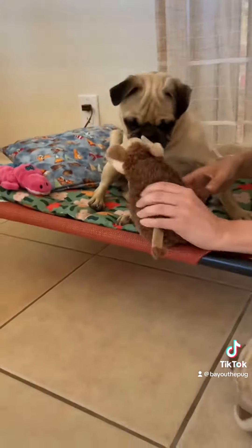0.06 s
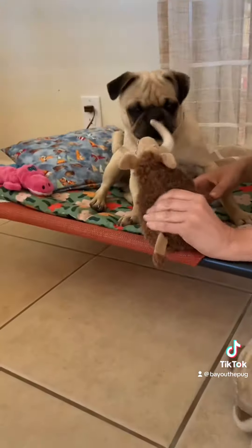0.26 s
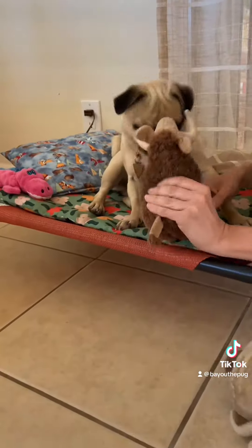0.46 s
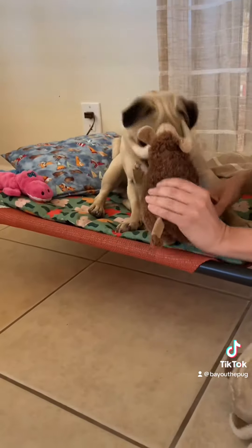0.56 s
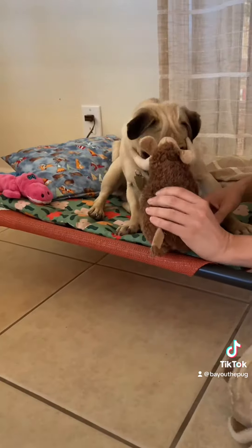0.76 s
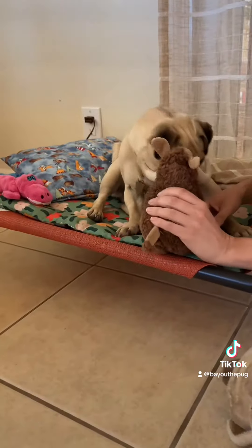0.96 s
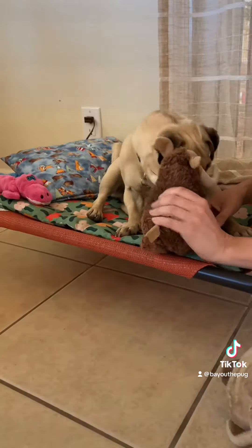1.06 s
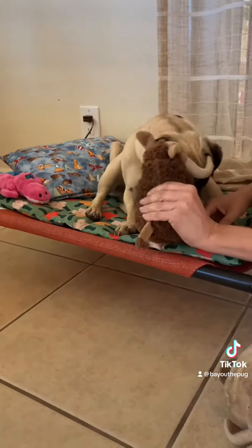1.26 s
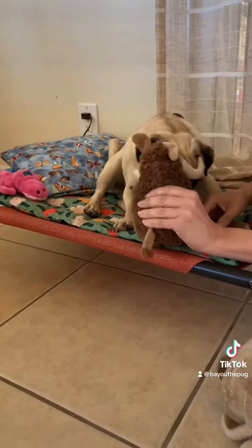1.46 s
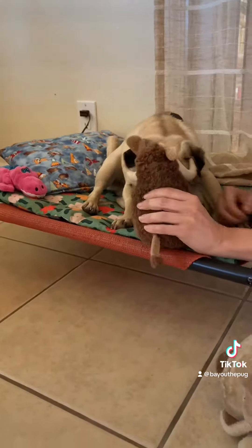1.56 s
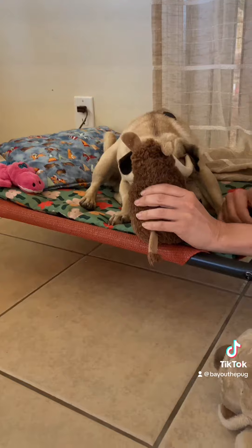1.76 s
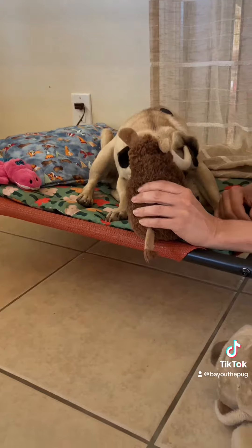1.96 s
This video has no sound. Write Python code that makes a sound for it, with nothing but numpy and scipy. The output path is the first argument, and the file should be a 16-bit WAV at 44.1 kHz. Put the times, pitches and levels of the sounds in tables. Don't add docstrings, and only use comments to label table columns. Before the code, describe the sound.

A squeaker in a plush toy is squeezed three times: a rising then sagging squeak, a very short airy chirp with a soft knock, and a steadier arched squeak. Close phone microphone, small tiled room, faint low hum.

```python
import sys
import numpy as np
from scipy import signal
from scipy.fft import rfft, irfft
from scipy.io import wavfile
from scipy.ndimage import uniform_filter1d

SR = 44100
rng = np.random.default_rng(int(sys.argv[2]) if len(sys.argv) > 2 else 0)


def unload_wav(signal):
    wavfile.write(
        sys.argv[1],
        SR,
        np.round(np.clip(np.atleast_2d(signal).T, -1, 1) * 32767).astype(np.int16),
    )


def field_ratio(decibels):
    return 10 ** (np.asarray(decibels, dtype=float) / 20)


N = 88200
T = np.arange(N) / SR

# [t/s, f/Hz, level/dB]
HUM = [(0.0, 98.42, -74), (0.319, 101.6, -57), (0.581, 97.84, -62.5), (0.67, 107.8, -59.5),
       (0.711, 102.4, -67), (0.751, 100.8, -54), (0.811, 99, -89.5), (0.85, 99.9, -62.5),
       (1.11, 95.57, -56), (1.199, 97.1, -68), (1.29, 96.66, -60.5), (1.37, 88.26, -61), (1.641, 87, -63),
       (1.689, 74.17, -60), (1.729, 79.35, -63), (2.0, 79.5, -68)]
SUB_HUM = [(0.0, 48.64, -82), (0.069, 48.86, -94.5), (0.411, 46.3, -69), (0.59, 46.98, -74.5),
           (0.73, 47.15, -68), (1.08, 48.4, -59), (1.27, 46.92, -80), (1.501, 44.94, -58),
           (1.64, 46.43, -73.5), (1.791, 50.87, -60.5), (1.9, 53.6, -62), (2.0, 50, -56.5)]
# [f/Hz, density/dB per Hz]
STILL_AIR = [(18, -24.5), (30, -12), (115, -2.5), (702, -30.5), (2120, -38.5), (10500, -40), (11700, -65.5),
             (14000, -50.5), (16000, -63.5)]
DRAG_T = [.63, .93, 1.14, 1.25, .05, 1.6, .3, .78]
# [rise/s, hold/s, fall/s, level/dB]
DRAGS = [(0.013, 0.037, 0.12, -55), (0.0087, 0.18, 0.11, -60.5), (0.043, 0.12, 0.039, -64.5),
         (.04, 0.063, 0.15, -69), (.008, 0.045, .06, -82), (0.024, 0.076, 0.054, -58),
         (.03, 0.041, 0.04, -77), (0.024, 0.043, .03, -79.5)]
# [f/Hz, density/dB per Hz]
DRAG_COLOUR = [(71, -39.5), (120, -6), (514, -23), (1180, -34.5), (1550, -53.5), (2140, -38.5), (3000, -48),
               (3900, -83.5), (6600, -120)]
# onsets [t/s], swells [rise/s, hold/s, fall/s], levels [level/dB]
SCUFF_T = [.935, .62, .055]
SCUFFS = [(.015, .08, .1), (.03, .15, .04), (.01, .06, .05)]
SCUFF_LEVEL = [-61.5, -69, -73.5]
# [f/Hz, density/dB per Hz]
SCUFF_COLOUR = [(120, -8), (250, -1.5), (650, -1.5), (800, -13), (1150, -16.5), (1400, -41)]
# onsets [t/s], swells [rise/s, hold/s, fall/s], levels [level/dB]
PUFF_T = [1.43, 1.47, 1.578]
PUFFS = [(.012, .025, .08), (.03, .05, .06), (.003, .01, .12)]
PUFF_LEVEL = [-63, -70.5, -79.5]
# [f/Hz, density/dB per Hz]
PUFF_COLOUR = [(200, 0), (600, 1), (1500, -4.5), (2300, -6), (3200, -12), (5000, -11), (5600, -30)]
# onsets [t/s], swells [rise/s, hold/s, fall/s], levels [level/dB]
HISS_T = [
    .055,
    1.432,
    1.57,
    .93,
    .572,
]
HISSES = [(.022, .158, .012), (.008, .03, .13), (.02, .03, .06), (.03, .04, .08), (.003, .004, .03)]
HISS_LEVEL = [-54.5, -64.5, -74.5, -80.5, -48.5]
# [f/Hz, density/dB per Hz]
HISS_COLOUR = [(300, -16.5), (1000, -10.5), (5000, -3), (5750, -7), (6500, -4.5), (8800, -5), (10900, -2),
               (12900, -4.5), (16000, -14.5)]
# [f/Hz, level/dB, T60/s]
TICK_MODES = [(930, -52, 0.025), (2730, -56.5, .012)]
# onsets [t/s], levels [level/dB]
KNOCK_T = [
    1.579,
    .5715,
    .056,
]
KNOCK_LEVEL = [-36.5, -35, -56]
# [f/Hz, level/dB, T60/s]
FRAME_MODES = [(265, 2.5, 0.086), (530, -1, 0.074), (745, -1, 0.1), (907, 11, 0.024), (1057, 3, 0.063),
               (1610, -13.5, 0.024)]
# [f/Hz, density/dB per Hz]
THUD_COLOUR = [(100, -34.5), (200, -3.5), (500, 4.5), (1200, 3.5), (1500, -12.5), (1900, -20), (2600, -25),
               (4000, -51)]
# [t/s, f/Hz, level/dB]
SQUEEZES = [
    [(.225, 1241, -43.5), (.236, 1157, -32), (.2385, 1215, -18), (.253, 1333, -16.5), (.263, 1466, -15.5),
     (.277, 1478, -21), (.281, 1180, -24.5), (.292, 1076, -25.5), (.296, 1000, -72)],
    [(.558, 881.7, -74), (.5715, 980, -40), (.5745, 1030, -23), (.5795, 1090, -27), (.581, 1070, -43),
     (.584, 950, -70)],
    [(1.075, 1220, -73), (1.091, 1219, -32), (1.094, 1210, -18.5), (1.104, 1234, -20), (1.114, 1281, -18),
     (1.129, 1206, -19), (1.14, 1147, -22), (1.155, 1102, -23.5), (1.163, 969.6, -59.5)],
]
# [air level/dB, shell treble level/dB, wobble factor]
MANNER = [
    (-21, -2.5, 2.2),
    (-9, 5, 16),
    (-22, -1, .7),
]
# [f/Hz, level/dB]
SHELL = [(1050, -3.5), (1400, -8), (2700, -8.5), (4900, -9), (6300, -3), (7600, 4.5), (8900, -1.5),
         (10300, -15.5)]
INHALE = [(950, -9.5), (2100, -9), (3200, -14.5), (4400, -13.5), (6200, -23.5), (7400, -5.5), (8400, -0.5),
          (10000, -5.5), ]
SHELL_TURNED = [(1100, -4.5), (2400, -10), (3700, -11), (5000, -8), (6200, -7), (7500, 1.5), (8700, 2),
                (10300, -13)]
# [f/Hz, T60/s]
ROOM_T60 = [(250, 0.057), (1150, 0.5), (1450, 0.6), (3500, 0.56), (9000, 0.28), (15000, 0.21)]
# [f/Hz, phase/rad]
PORT_PHASE = [(250, -1), (600, -2), (1200, -0.32), (2600, 1), (5750, 3.1), (8800, 7), (11800, 8.5),
              (16000, 13.8)]

SHELL_TOP_HZ, TOP_SAG_DB = 15300, -11
SIDE_GAP_HZ = 8600


def curve(hz, table):
    table = np.array(table, float)
    return np.interp(np.log(np.maximum(hz, 1)), np.log(table[:, 0]), table[:, 1])


def shape(x, gain):
    f = np.arange(N + 1) * SR / (2 * N)
    return irfft(rfft(x, 2 * N) * gain(f), 2 * N)[..., :N]


def noise(table, like):
    mid, side = rng.standard_normal((2, N))
    mid = shape(mid, lambda f: field_ratio(curve(f, table)) * np.sqrt(1 + like(f)))
    side = shape(side, lambda f: field_ratio(curve(f, table)) * np.sqrt(1 - like(f)))
    return np.array([mid + side, mid - side]) / np.sqrt(np.mean(mid ** 2 + side ** 2))


def incoherent(f):
    return 0 * f


def bass_coherent(f):
    return np.clip(1 - f / 900, .1, 1)


def walk(rate):
    k = int(SR / rate)
    w = uniform_filter1d(uniform_filter1d(rng.standard_normal(N), k), k)
    return w / w.std()


def swells(times, table):
    total = 0
    for t, (rise, hold, fall, db) in zip(times, table):
        growth = np.clip((T - t) / rise, 0, 1) ** 2
        decay = np.exp(-3 * np.maximum(T - t - rise - hold, 0) / fall)
        total = total + field_ratio(db) * growth * decay
    return total


def decaying_modes(age, modes):
    return sum(field_ratio(db - 60 * age / t60) * np.sin(2 * np.pi * hz * age) for hz, db, t60 in modes)


def hum():
    out = 0
    for table in HUM, SUB_HUM:
        t, hz, db = np.array(table).T
        level = field_ratio(np.interp(T, t, db) + 0.92 * walk(23))
        phase = 2 * np.pi * np.cumsum(np.interp(T, t, hz)) / SR
        out = out + np.sqrt(2) * level * np.sin(phase)
    return out


def still_air():
    return field_ratio(-68.5 + 0.83 * walk(14.0)) * noise(STILL_AIR, bass_coherent)


def fabric_drag():
    return swells(DRAG_T, DRAGS) * field_ratio(3.4 * walk(25)) * noise(DRAG_COLOUR, bass_coherent)


def cloth_puffs():
    swell = swells(PUFF_T, np.c_[PUFFS, PUFF_LEVEL])
    return swell * field_ratio(3.1 * walk(60)) * noise(PUFF_COLOUR, lambda f: 0.54 + 0 * f)


def scuffs():
    swell = swells(SCUFF_T, np.c_[SCUFFS, SCUFF_LEVEL])
    return swell * field_ratio(3.6 * walk(40)) * noise(SCUFF_COLOUR, lambda f: 0.36 + 0 * f)


def air_and_rub():
    swell = field_ratio(-85.5) + swells(HISS_T, np.c_[HISSES, HISS_LEVEL])
    return swell * field_ratio(1.0 * walk(30)) * noise(HISS_COLOUR, lambda f: 0.9 + 0 * f)


def knocks():
    thud_db, thud_t60_s, shudder_db, shudder_t60_s = 5.5, 0.0043, -16.5, 0.19
    push_s = 0.00013
    out, cloth = np.zeros(N), noise(THUD_COLOUR, incoherent)[0]
    for t, db in zip(KNOCK_T, KNOCK_LEVEL):
        age = np.maximum(T - t, 0)
        ring = field_ratio(-10.0) * decaying_modes(age, FRAME_MODES)
        thud = cloth * (field_ratio(thud_db - 60 * age / thud_t60_s) + field_ratio(shudder_db - 60 * age / shudder_t60_s))
        out += field_ratio(db) * (ring + thud) * (1 - np.exp(-(age / push_s) ** 2))
    return out


def claw_tick():
    return decaying_modes(np.maximum(T - .0545, 0), TICK_MODES)


def shell_pops():
    pop = [(1774, -36.5, 0.017)]  # f/Hz, level/dB, T60/s
    return sum(decaying_modes(np.maximum(T - rows[1][0], 0), pop) for rows in SQUEEZES)


def squeaker():
    bright_per_db, airy_per_db = 0.86, 0.5312
    reed_air_db, flutter_db = -14.5, .9
    out, wobble = 0, 0.0039 * walk(600)
    for rows, (air_db, treble_db, rough), shell in zip(SQUEEZES, MANNER, (SHELL, INHALE, SHELL_TURNED)):
        t, hz, db = np.array(rows).T
        hz = np.interp(T, t, hz) * (1 + rough * wobble)
        db = np.interp(T, t, db, -150, -150)
        phase = 2 * np.pi * np.cumsum(hz) / SR
        slack = np.clip(db + 16.5, -40, 0)
        for k in range(1, 15):
            tilt = (treble_db + bright_per_db * slack) * np.log2(k) / 3
            tilt = tilt + TOP_SAG_DB * np.clip(k * hz / 5000 - 2, 0, 1)
            flutter = flutter_db * np.log2(k + 1) * walk(130)
            level = field_ratio(db + 0.5 + tilt + curve(k * hz, shell) + flutter)
            out = out + level * np.cos(k * phase + 0.35 * k * k) * (k * hz < SHELL_TOP_HZ)
        top = [(SHELL_TOP_HZ, shell[-1][1] + TOP_SAG_DB), (SHELL_TOP_HZ + 300, -60)]
        air = noise(shell + top, incoherent)[0] * (1 + .5 * np.cos(phase))
        out = out + field_ratio(db + air_db + reed_air_db - airy_per_db * slack) * air
    return out


def room(x):
    gap_s, build_s = 0.003, 0.0081
    early_db, early_stretch = 8.5, 0.15
    age, tail = T[:SR] - gap_s, 0
    echoes = noise([(100, 0.0039), (1000, 0.005)], lambda f: np.clip(1 - f / 500, 0.33, 1))
    for hz in 125 * 2. ** np.arange(8):
        octave = lambda f: np.cos(np.pi / 2 * np.clip(np.log2(f / hz + 1e-9), -1, 1)) ** 2
        band = shape(echoes, octave)[:, :SR]
        t60 = curve(hz, ROOM_T60)
        decay = field_ratio(-60 * age / t60) + field_ratio(early_db - 60 * age / t60 / early_stretch)
        tail = tail + band * decay * np.clip(age / build_s, 0, 1)
    tail = tail / np.sqrt(np.sum(tail ** 2) / 2)
    return field_ratio(-4) * signal.fftconvolve(x[None], tail, axes=1)[:, :N]


def gate(x):
    edge_db, tilt_db, depth_db = -91.5, -4, -20.5
    f, _, z = signal.stft(x, SR, nperseg=512)
    power = uniform_filter1d(np.mean(abs(z) ** 2, axis=0), size=9, axis=0)
    power = uniform_filter1d(power, size=5, axis=1)
    edge = field_ratio(3.5 * (edge_db + tilt_db * np.log2(np.maximum(f, 1000) / 1000)))[:, None]
    open_share = np.where(f[:, None] > 250, power ** 2 / (power ** 2 + edge), 1)
    return signal.istft(z * field_ratio(depth_db * (1 - open_share)), SR, nperseg=512)[1][:, :N]


def ports(x):
    hz, rad = np.array(PORT_PHASE, float).T
    return np.array([shape(x[0], lambda f: np.exp(1j * np.interp(f, hz, rad))), x[1]])


def scene():
    bass_left_db = 4.5
    low = (hum() + fabric_drag() + still_air()) * field_ratio(np.array([[.5], [-.5]]) * bass_left_db)
    cloth = air_and_rub() + cloth_puffs() + scuffs()
    near = knocks() + claw_tick() + shell_pops() + squeaker()
    return ports(gate(near + room(near)) + cloth) + low


def notch(f, hz, width_hz):
    return field_ratio(-55 * np.exp(-((f - hz) / width_hz) ** 6))


def band_limit(x):
    return signal.sosfilt(signal.butter(12, 16270, fs=SR, output="sos"), x)


def record(dry):
    open_db, open_s = -5, .016
    x = shape(dry, lambda f: (f > 32) * (f < 16050))
    side_gain = lambda f: (f < 12800) * field_ratio(-4 * (f > SIDE_GAP_HZ))
    mid = shape((x[0] + x[1]) / 2, lambda f: notch(f, 11767, 1087))
    side = shape((x[0] - x[1]) / 2, lambda f: notch(f, SIDE_GAP_HZ, 860) * side_gain(f))
    kept = np.array([mid + side, mid - side])
    attack = sum(abs(T - rows[1][0] - open_s / 2) < open_s / 2 for rows in SQUEEZES)
    attack = uniform_filter1d(1. * attack, size=100)
    return band_limit(kept + field_ratio(open_db) * attack * (x - kept))


dry = scene()
out = record(dry)
unload_wav(out)
```